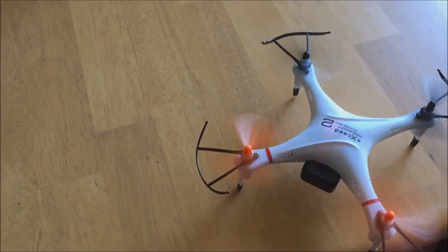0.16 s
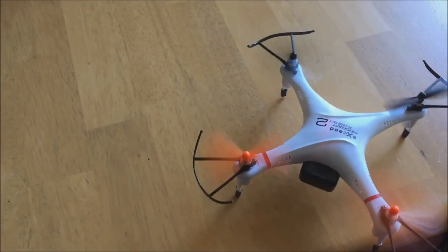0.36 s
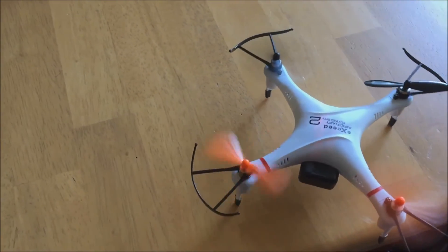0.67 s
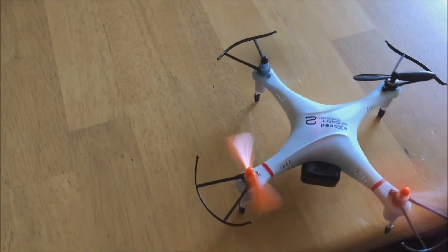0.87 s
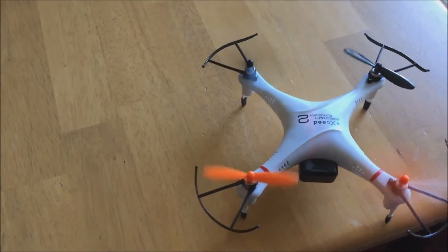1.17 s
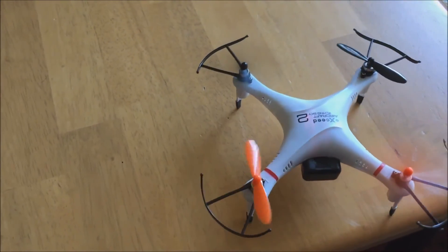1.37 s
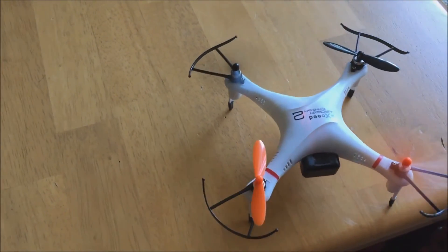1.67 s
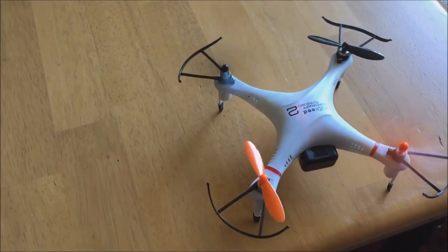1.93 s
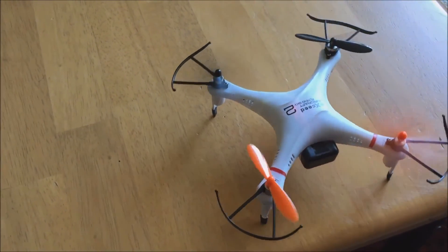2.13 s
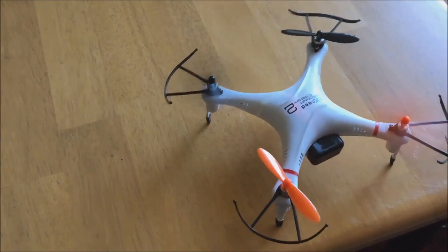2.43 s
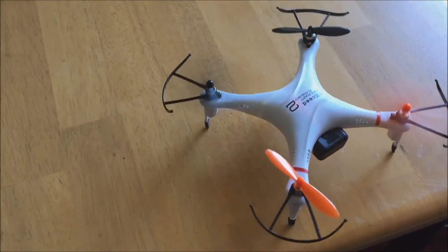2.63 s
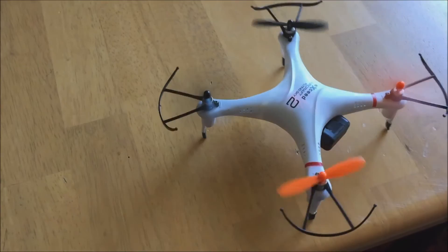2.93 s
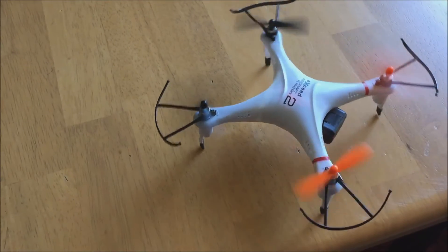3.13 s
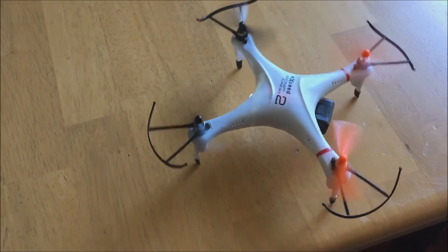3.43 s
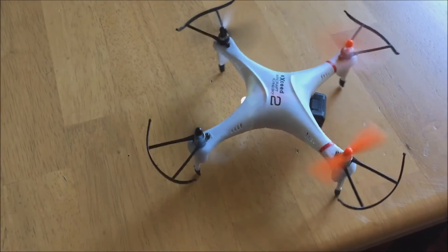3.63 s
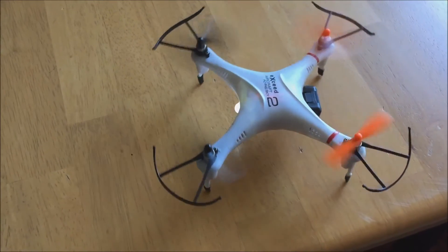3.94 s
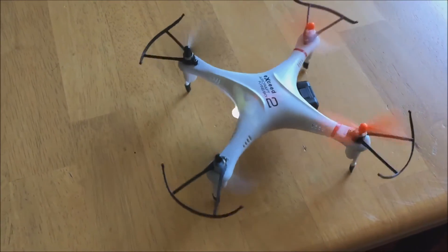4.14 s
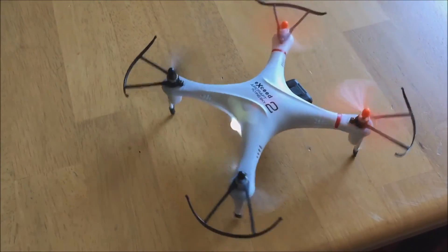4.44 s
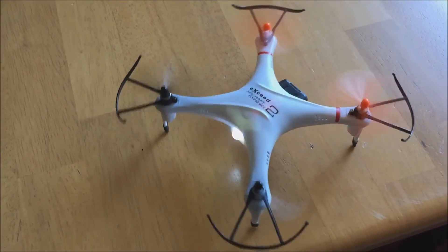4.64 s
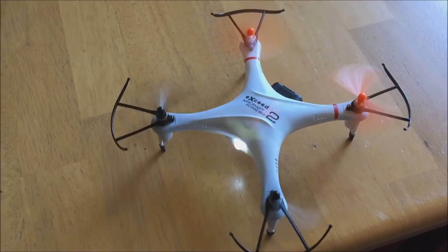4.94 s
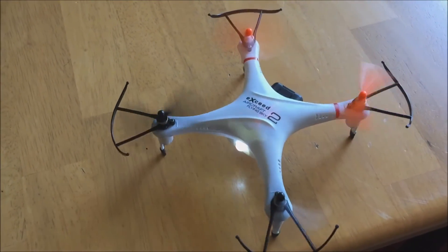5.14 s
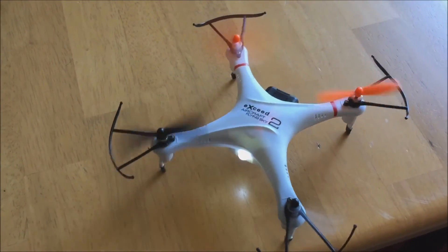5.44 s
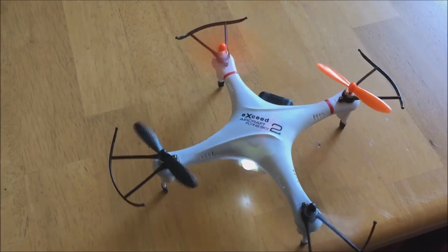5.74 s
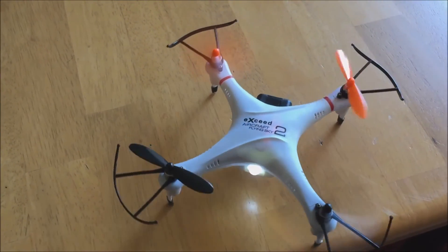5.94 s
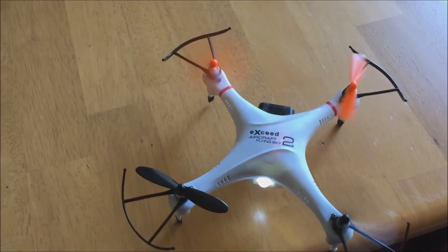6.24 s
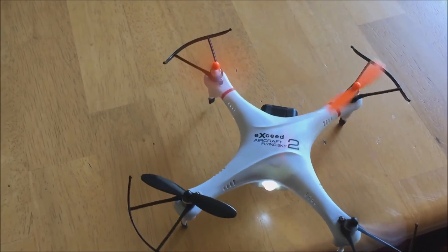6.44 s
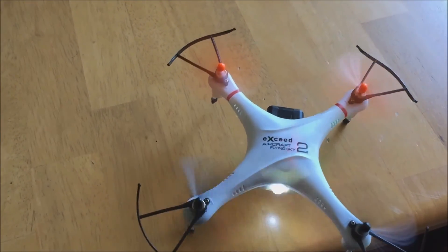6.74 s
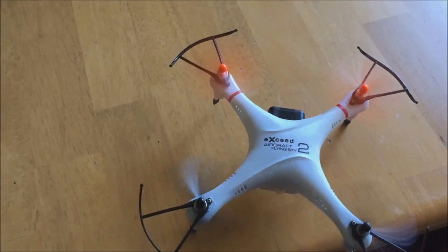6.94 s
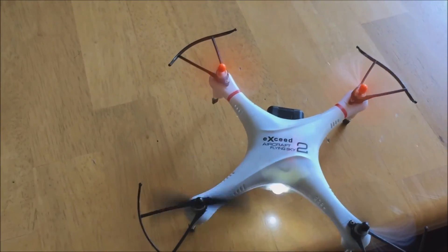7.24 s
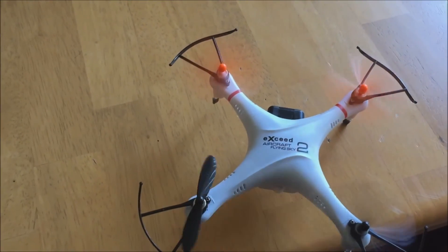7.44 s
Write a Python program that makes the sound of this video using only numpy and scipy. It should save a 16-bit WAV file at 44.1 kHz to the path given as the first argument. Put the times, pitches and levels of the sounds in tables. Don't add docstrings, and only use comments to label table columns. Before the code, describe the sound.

A small toy drone's motors whine in a warbling two-note buzz with hissing blades and a drumming table, then glide down into quiet hum.

```python
import sys
import numpy as np
from scipy import signal
from scipy.fft import rfft, irfft, next_fast_len
from scipy.io import wavfile
from scipy.ndimage import uniform_filter1d, map_coordinates

SR = 44100
rng = np.random.default_rng(int(sys.argv[2]) if len(sys.argv) > 2 else 0)


def int16_out(signal):
    q = np.round(np.clip(np.atleast_2d(signal).T, -1, 1) * 32767)
    wavfile.write(sys.argv[1], SR, q.astype(np.int16))


def boost_factor(decibels):
    exponent = np.asarray(decibels, float) / 20
    return 10 ** exponent


N = 335050
TIME = np.arange(N) / SR
COAST_FROM_S = 6.73

MULTIPLES = [1, 3, 4, *range(6, 27)]
# near motor [level/dB], far motor [level/dB]
ORDER_LEVELS = [(0, 2.5), (3, 4), (-3, 6.5), (0.5, 6), (2, 0.5), (-3.5, 1), (0, -44), (-8, -3.5), (-5, -30),
                (-13.5, -4), (-18, -30), (-1.5, -5.5), (-24, -30), (-7.5, 1), (-15, -28), (-6, -2),
                (-26, -23), (-11, -1.5), (-18, -34), (-17, -0.5), (-14, -24), (-3, -3), (-17, -37),
                (-19, -13)]


def unit(x):
    return x / np.sqrt(np.mean(x ** 2) + 1e-20)


def curves(rows):
    s, *cols = np.transpose(rows)
    return [np.interp(TIME, s, c) for c in cols]


def coasting(start):
    return np.clip(TIME - start, 0, None)


def wobble(rate):
    knots = rng.standard_normal(int(N * rate / SR) + 4)
    return map_coordinates(knots, [TIME * rate])


def coloured(x, spectrum):
    hz, db = np.transpose(spectrum)
    size = next_fast_len(N + 8192)
    log_f = np.log(np.fft.rfftfreq(size, 1 / SR) + 1)
    gain = boost_factor(np.interp(log_f, np.log(hz), db))
    return irfft(rfft(x, size) * gain, size)[:N]


def rush(spectrum, patchy_db):
    z = signal.stft(rng.standard_normal(N + 512), nperseg=512)[2]
    field = uniform_filter1d(rng.standard_normal(z.shape), size=8, axis=0)
    field = uniform_filter1d(field, size=8, axis=1)
    patchy = signal.istft(z * boost_factor(patchy_db * unit(field)), nperseg=512)[1][:N]
    return unit(coloured(patchy, spectrum))


def room():
    # f/Hz, level/dB per Hz
    floor = [(25, -24), (119, -12), (160, -32), (430, -4), (700, -16), (1100, -22), (1850, -1), (2230, 5.5),
             (2750, -7.5), (4500, -27), (8100, -48), (8550, -5.5), (9000, -35), (15500, -44)]
    hum = np.sin(2 * np.pi * 120 * TIME)
    return boost_factor(-49.5) * rush(floor, patchy_db=.8) + boost_factor(-66.5) * hum


def table():
    # f/Hz, level/dB per Hz
    drumming = [(15, -45), (25, -16.5), (128, 0.5), (204, -1.5), (339, -9.5), (397, -7), (466, -42),
                (600, -17), (780, -33), (1320, -120)]
    fade_db = -75 * coasting(6.88)
    rattle = boost_factor(1.5 * wobble(12)) * rush(drumming, patchy_db=1.2)
    return boost_factor(-50.5 + fade_db) * unit(rattle)


def air():
    # t/s, level/dB
    downwash = [
        (0, -25.5),
        (1.25, -26.5),
        (2, -30),
        (2.4, -33.5),
        (4.3, -33.5),
        (5.1, -31),
        (5.8, -28),
        (6.3, -27.5),
        (6.75, -27),
    ]
    # t/s, level/dB
    puffs = [(0.382, 3), (1.75, 4), (5.7, 9.5), (5.13, 3.5), (6.5, 4), (7.5, -15), (4.6, 0), (5, -5),
             (5.69, -17), (2.3, -3), (2.6, 1)]
    puff_s = 0.02
    flow_db = curves(downwash)[0]
    puffs_db = sum(db * np.exp(-((TIME - s) / puff_s) ** 2) for s, db in puffs)
    hiss_db = flow_db + puffs_db - 56 * coasting(6.85)
    wake_db = -31.5 + (0.34 - 1) * (flow_db + 28.5) - puffs_db + 30.5
    wake_db = wake_db - 14 * coasting(COAST_FROM_S)
    return hiss_db, wake_db


def swish(angle, spectrum, memory):
    slots = 128
    passes = angle / np.pi
    fresh = rng.standard_normal((int(passes[-1]) + 2, slots))
    pattern = signal.lfilter([1], [1, -np.clip(memory, 0, .9)], fresh, axis=0).ravel()
    noise = np.interp(passes * slots, np.arange(pattern.size), pattern)
    return unit(coloured(noise, spectrum))


def blade_hiss(near, far):
    # f/Hz, level/dB per Hz
    tips = [(2000, -45), (3800, -12), (4800, -7.5), (6200, 1), (7800, -3.5), (9500, -1.5), (12000, -1),
            (15500, -1)]
    passes = (1 + .3 * np.cos(2 * near)) * (1 + .3 * np.cos(2 * far))
    gusts = boost_factor(0.73 * wobble(8) + 0.71 * wobble(15) + 0.78 * wobble(38))
    facing = np.clip((TIME - 2.2) / 3, .1, .9)
    swishes = np.sqrt(facing) * swish(near, tips, memory=.62)
    swishes += np.sqrt(1 - facing) * swish(far, tips, memory=.75)
    loose = boost_factor(-8) * rush(tips, patchy_db=1.2)
    return unit(passes * gusts * (swishes + loose))


def blade_wake(near, far):
    # f/Hz, level/dB per Hz
    churn = [(300, -53), (560, -22.5), (800, -11.5), (1030, -14), (1400, -6.5), (2100, 1), (3200, -6),
             (4200, -13.5), (6000, -33)]
    turns = swish(near / 2, churn, memory=.65) + swish(far / 2, churn, memory=.65)
    return unit(turns + .65 * rush(churn, patchy_db=2.5))


def blades(near, far):
    hiss_db, wake_db = air()
    wake = boost_factor(wake_db - 5) * blade_wake(near, far)
    return boost_factor(hiss_db + 0.7) * (blade_hiss(near, far) + wake)


def turning():
    turn_s = (2.3, 2.75, 4.95, 5.35)
    return np.interp(TIME, turn_s, (0, 1, 1, 0))


def settling():
    rate_hz, depth_hz, decay_s = 3.25, 4, .9
    since = coasting(np.array((.3, 5.3))[:, None])
    ringing = np.sin(2 * np.pi * rate_hz * since) * np.exp(-since / decay_s)
    return depth_hz * np.sum(ringing, axis=0)


def shaft(rows, swing, unsteady):
    coast_s, bend = .513, 1.28
    mean, depth = curves(rows)
    mean = uniform_filter1d(mean, size=2500) + settling() + .2 * depth * wobble(5)
    depth = depth * boost_factor(1.1 * wobble(6)) * (TIME < COAST_FROM_S)
    slowing = np.exp(-(coasting(COAST_FROM_S) / coast_s) ** bend)
    speed = mean * slowing + depth * np.sin(swing) + unsteady * wobble(40)
    throb_db = 0.38 * depth * np.sin(swing + 0.5)
    return 2 * np.pi * np.cumsum(speed) / SR, throb_db


def tone(angle, flutter_db, rate=14):
    flutter = boost_factor(flutter_db * wobble(rate))
    return np.sqrt(2) * flutter * np.sin(angle + rng.uniform(0, 2 * np.pi))


def layers(load, mix, fading):
    over_db, turn_db, swung_db, surge_db, start, fade = np.array([*mix, *fading])[:, :, None]
    swung = np.interp(TIME, (2.1, 5.1), (0, 1))
    surge = np.interp(TIME, (6.5, 6.68), (0, 1))
    level_db = curves(load)[0] + over_db + turn_db * turning()
    return level_db + swung_db * swung + surge_db * surge - fade * coasting(start)


def motor(angle, throb_db, load, orders, whine_db, blade_db, low_db, high_db):
    # f/Hz, level/dB
    shell = [(250, -14), (420, -25), (800, -14.5), (1300, -0.5), (2200, -4), (3300, -3), (4700, -9.5),
             (6200, -3.5), (7800, -12), (15000, -0.5)]
    whine, blade, low, high = load
    bars = boost_factor(whine + whine_db + throb_db) * tone(angle * 5, 1.3)
    steady = sum(boost_factor(db) * tone(k * angle, 3.03) for k, db in orders if k < 9.5)
    blurred = sum(boost_factor(db) * tone(k * angle, 5, 110) for k, db in orders if k > 9.5)
    others = boost_factor(low + low_db) * steady + boost_factor(high + high_db) * blurred
    return bars + boost_factor(blade + blade_db) * tone(2 * angle, 1.9) + coloured(others, shell)


def third_motor(swing):
    # t/s, mean shaft turns f/Hz, hunting depth/Hz
    drive = [
        (0, 386, 6),
        (5, 385, 6),
        (5.3, 392, 5),
    ]
    angle, throb_db = shaft(drive, swing, unsteady=1.203)
    whine = tone(angle * 5, 2.5)
    level_db = -32 - 60 * (1 - turning()) ** 2
    return boost_factor(level_db + throb_db) * (whine + boost_factor(-13.0) * tone(2 * angle, 1.5))


def far_motor(swing):
    # t/s, mean shaft turns f/Hz, hunting depth/Hz
    drive = [(0, 385, 2), (.12, 411.5, 2), (.22, 419, 2), (.9, 413.5, 3), (1.28, 422.5, 1), (1.5, 416.5, 2),
             (1.75, 414.5, 1), (2, 422, 1), (2.2, 424.5, 1), (2.35, 416, 2), (2.7, 382, 9), (3.1, 372, 11),
             (4.7, 375.5, 12), (5.02, 371, 5), (5.4, 415, 2), (6.12, 414.8, 1), (6.55, 393, 2),
             (6.72, 400, 1)]
    # t/s, level/dB
    load = [(0, -25), (.25, -25.5), (.7, -23.5), (1.1, -24.5), (2.1, -27), (2.6, -26), (3.3, -25),
            (4.1, -23.5), (5.05, -26.5), (5.7, -21.5), (6.15, -23), (6.35, -27.5), (6.75, -25.5)]
    # whine, blade tone, low orders, high orders [level/dB]
    mix = [
        (-0.15, -16, -8, -6.5),
        (0.23, 0, -3, -7.5),
        (0, 5.5, -5.5, -5),
        (1, -3.5, 1, 5),
    ]
    # start t/s, fade/dB per s
    fading = [
        (6.75, 6.77, 6.74, 6.78),
        (250, 170, 100, 75),
    ]
    angle, throb_db = shaft(drive, swing + 2.51, unsteady=0.879)
    orders = list(zip(MULTIPLES, np.transpose(ORDER_LEVELS)[1]))
    return angle, motor(angle, throb_db, layers(load, mix, fading), orders,
                        whine_db=-6.0, blade_db=-3.0, low_db=-8.5, high_db=-8)


def near_motor(swing):
    # t/s, mean shaft turns f/Hz, hunting depth/Hz
    drive = [(0, 368, 4), (.09, 389, 3), (.22, 400.5, 2), (.9, 399, 5.5), (1.17, 411.5, 1.5),
             (1.44, 409, 3), (1.8, 399.5, 1.5), (2.07, 406.5, 1), (2.28, 406, .6), (2.5, 385, 3),
             (2.8, 380, 9), (4.6, 382.5, 9), (5.02, 375, 8), (5.42, 402, 3.5), (5.8, 397, 1),
             (6.25, 406.7, .6), (6.42, 401, 1), (6.73, 418, .6)]
    # t/s, level/dB
    load = [(0, -27), (.1, -19.5), (.5, -21), (1.1, -22), (2.1, -23), (2.6, -28), (4.1, -33), (4.8, -27.5),
            (5.3, -23), (6.15, -22.5), (6.75, -22)]
    # whine, blade tone, low orders, high orders [level/dB]
    mix = [
        (0, -16, -11, -13),
        (0, 4, 0, -4),
        (0, 1.5, 0, 3),
        (0, 1, 6, 2),
    ]
    # start t/s, fade/dB per s
    fading = [
        (6.82, 6.78, 6.78, 6.78),
        (380, 125, 74, 50),
    ]
    angle, throb_db = shaft(drive, swing, unsteady=0.789)
    orders = list(zip(MULTIPLES, np.transpose(ORDER_LEVELS)[0]))
    return angle, motor(angle, throb_db, layers(load, mix, fading), orders,
                        whine_db=-0.5, blade_db=-6.0, low_db=-8.5, high_db=-4.5)


def quadcopter():
    # t/s, swings f/Hz
    hunting = [
        (0, 16),
        (1.05, 15),
        (2.4, 30),
        (3, 23.5),
        (4.4, 21.5),
        (5.3, 27),
        (7.6, 25),
    ]
    swings_hz = curves(hunting)[0] * (1 + .05 * wobble(5))
    swing = 2 * np.pi * np.cumsum(swings_hz) / SR
    near, near_tones = near_motor(swing)
    far, far_tones = far_motor(swing)
    return near_tones + far_tones + third_motor(swing + 4.24) + blades(near, far)


def scene():
    return (room() + table() + quadcopter())[None]


def strongest_lines(x, keep_db, masked_db):
    # t/s, half length/s, kept within level/dB of the loudest
    thinned = [(1.707, .011, 29.5), (2.157, .011, 29), (2.218, .011, 31.5), (2.345, .011, 31),
               (2.598, .015, 22.5), (3.114, .011, 29), (3.249, .011, 28), (4.045, .011, 30),
               (4.377, .011, 27.5), (4.591, .025, 23), (4.93, .011, 28.5), (5.106, .011, 27),
               (5.168, .011, 29.5), (5.608, .011, 28), (5.682, .011, 31.5), (6.81, .012, 23),
               (7.427, .009, 23), (7.51, .009, 24)]
    hz, t, z = signal.stft(x, SR, window="cosine", nperseg=1024, noverlap=768)
    power = uniform_filter1d(abs(z) ** 2, size=3, axis=-2)
    level = np.sqrt(uniform_filter1d(power, size=3, axis=-1))
    loudest = uniform_filter1d(level.max(axis=-2, keepdims=True), size=15, axis=-1)
    within = np.full(len(t), keep_db)
    for s, half, db in thinned:
        within[abs(t - s) < half] = db
    between = (hz > 420) & (hz < 1150)
    limit = np.where(between[:, None], np.minimum(within, masked_db), within)
    kept = (level > loudest * boost_factor(-limit)) & (hz < 15350)[:, None]
    return signal.istft(z * kept, SR, window="cosine", nperseg=1024, noverlap=768)[1][..., :N]


def roll_off(x):
    return signal.sosfilt(signal.butter(12, 16640, fs=SR, output="sos"), x)


def record(dry):
    mix = strongest_lines(dry, keep_db=52., masked_db=40.)
    return roll_off(mix)


dry = scene()
out = record(dry)
int16_out(out)
```